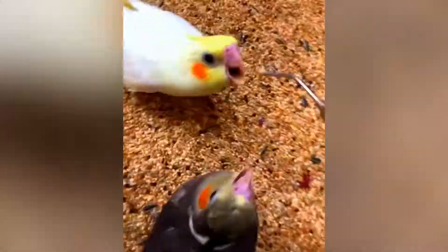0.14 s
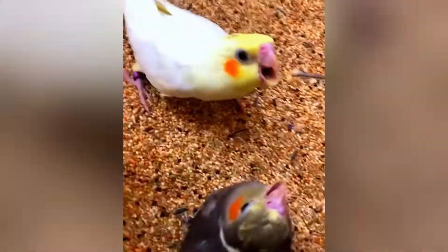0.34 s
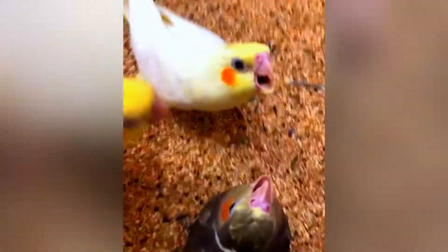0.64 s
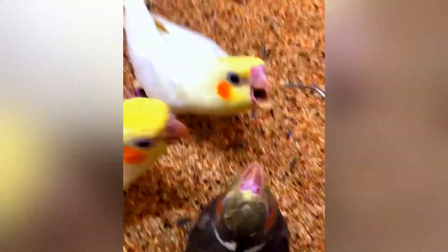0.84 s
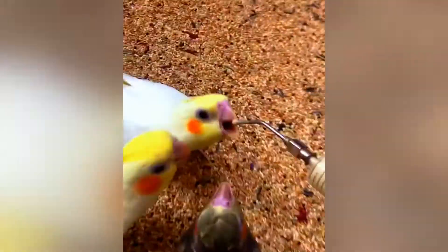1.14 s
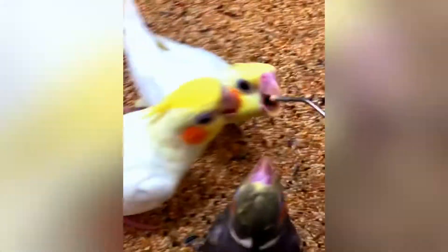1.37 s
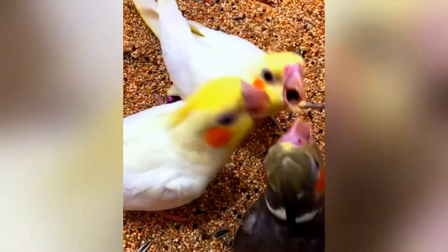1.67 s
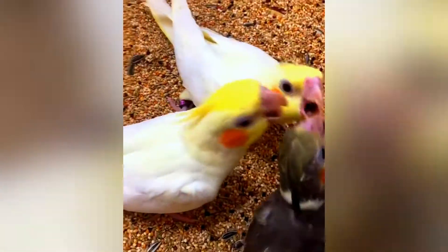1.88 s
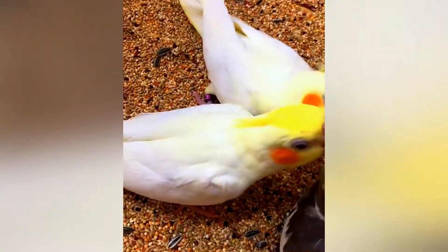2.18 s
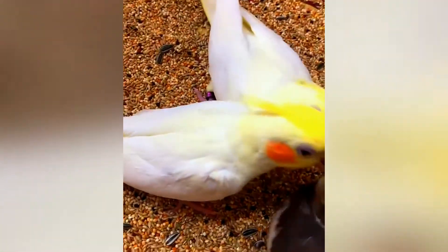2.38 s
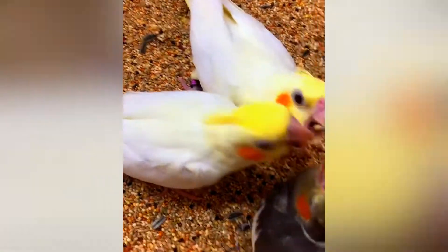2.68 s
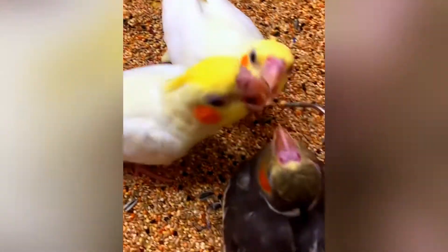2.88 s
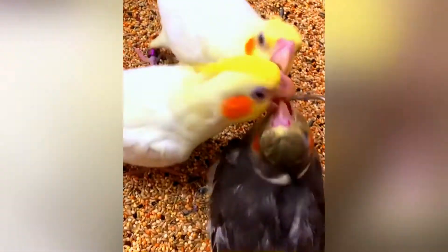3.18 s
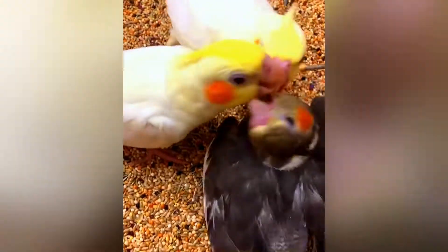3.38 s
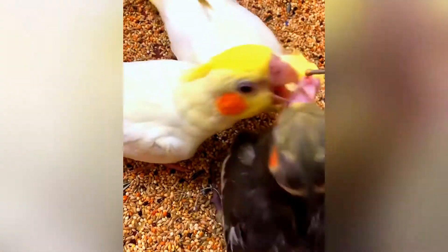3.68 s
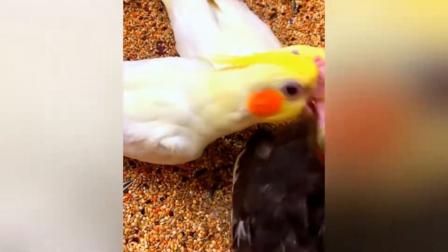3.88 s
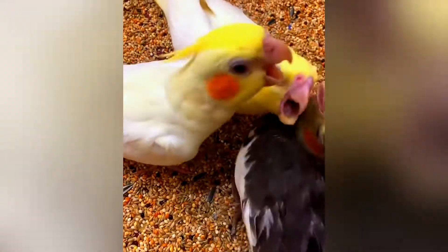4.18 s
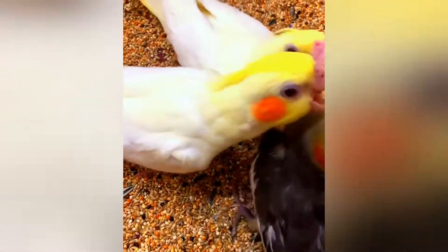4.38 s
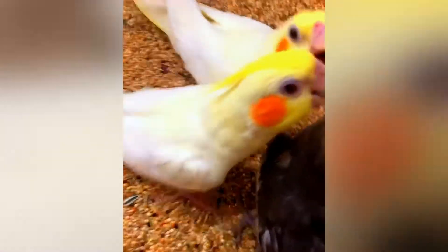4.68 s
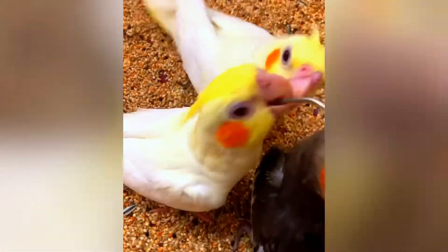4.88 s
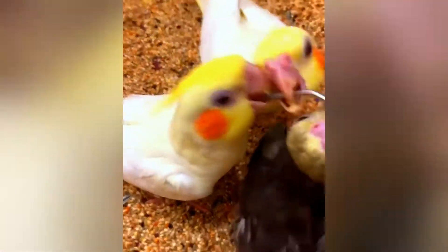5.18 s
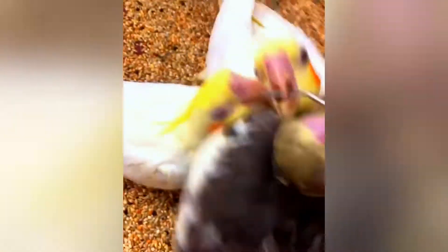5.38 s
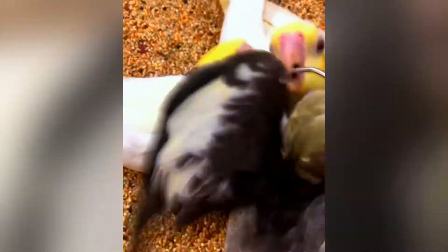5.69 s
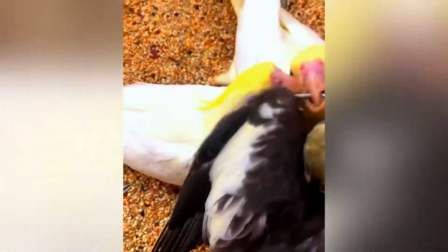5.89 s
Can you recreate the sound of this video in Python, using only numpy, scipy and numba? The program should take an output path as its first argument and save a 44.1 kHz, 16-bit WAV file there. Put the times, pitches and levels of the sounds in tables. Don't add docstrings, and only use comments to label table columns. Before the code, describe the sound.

Three young cockatiels beg right beside a hand-held phone in a quiet, dry room. Harsh fluttering rasps follow one another almost without a break, each swelling and cutting off abruptly, some on a tiny pip. Thin high whistles waver through the first four and a half seconds, a short arched peep comes near three seconds, and quick falling chirps close the scene. Dull knocks and taps come from the moving hand.

```python
import sys
import numpy as np
from scipy import signal
from scipy.fft import rfft, irfft
from scipy.io import wavfile
from scipy.ndimage import uniform_filter1d
from numba import njit

SR = 44100
rng = np.random.default_rng(int(sys.argv[2]) if len(sys.argv) > 2 else 0)


def to_wav(sig):
    pcm = np.clip(np.atleast_2d(sig), -1, 1) * 32767
    pcm = np.round(pcm).astype(np.int16)
    wavfile.write(sys.argv[1], SR, pcm.T)


def ratio_of_db(decibels):
    return 10 ** (np.asarray(decibels, float) / 20)


N = 266011
TIME = np.arange(N) / SR


def rms_one(x):
    return x / np.sqrt(np.mean(x ** 2) + 1e-20)


def in_time(rows):
    s, *columns = np.transpose(rows)
    return [np.interp(TIME, s, c) for c in columns]


def while_sounding(start_s, end_s, rise_s, fall_s):
    return np.clip((TIME - start_s) / rise_s, 0, 1) * np.clip((end_s - TIME) / fall_s, 0, 1)


def drift(rate_hz):
    r = np.exp(-2 * np.pi * rate_hz / SR)
    return rms_one(signal.lfilter([1], [1, -2 * r, r * r], rng.standard_normal(N + SR))[SR:])


def sine(hz):
    return np.sin(2 * np.pi * np.cumsum(hz) / SR)


def band_noise(low_hz, high_hz, order, length=N):
    sos = signal.butter(order, [low_hz, high_hz], "band", fs=SR, output="sos")
    return rms_one(signal.sosfilt(sos, rng.standard_normal(length)))


def between(x, low_hz, high_hz):
    hz = np.fft.rfftfreq(N, 1 / SR)
    return signal.hilbert(irfft(rfft(x) * ((hz > low_hz) & (hz < high_hz)), N))


@njit
def resonate(x, c, r):
    y = np.zeros(len(x))
    for i in range(2, len(x)):
        y[i] = (1 - r * r) / 2 * (x[i] - x[i - 2]) + 2 * r * c[i] * y[i - 1] - r * r * y[i - 2]
    return y


def cavity(x, hz, width_hz):
    c, r = np.cos(2 * np.pi * hz / SR) * np.ones(N), np.exp(-np.pi * width_hz / SR)
    return rms_one(resonate(resonate(x, c, r), c, r))


# (frequency [Hz], density [dB per Hz])
ROOM_AIR = [(40, -34), (300, -10.5), (1000, -1), (3000, 8.5), (8000, -1)]


def floor():
    hz, (at_hz, db) = np.linspace(1, SR / 2, N // 2 + 1), np.transpose(ROOM_AIR)
    colour = ratio_of_db(np.interp(np.log(hz), np.log(at_hz), db, right=-60))
    return ratio_of_db(-13.5) * rms_one(irfft(rfft(rng.standard_normal(N)) * colour, N))


def room(x):
    t, t60_s = TIME[:SR // 6], .08
    echoes = rms_one(rng.standard_normal(len(t))) * ratio_of_db(-60 * t / t60_s) * (t > .003)
    return signal.fftconvolve(x, echoes)[:N]


# (centre [s], half length [s], level [dB])
SWAYS = [(.3, 0.093, -57), (.425, 0.062, -39.5), (0.583, 0.061, -51), (.7, .05, -59), (1.15, .06, -66),
         (1.35, 0.097, -57), (1.93, .03, -58), (2.835, .05, -67), (3.4, .06, -65), (4.62, .06, -61),
         (4.89, .025, -49), (5.09, .04, -63), (5.34, .04, -57), (5.536, 0.026, -38), (5.733, .03, -68)]
# (time [s], frequency [Hz], level [dB])
TAPS = [(.192, 480, -28), (.424, 835, -19), (1.908, 564, -32), (4.578, 800, -26), (4.945, 510, -26),
        (5.52, 680, -23), (5.521, 1020, -21.5)]


def sways_and_taps():
    sway_hz, tap_t60_s = 62.2, 0.033
    push = np.sqrt(2) * sine(sway_hz * ratio_of_db(4.9 * drift(24.7)))
    out = push * sum(ratio_of_db(db) * np.exp(-((TIME - s) / half_s) ** 2) for s, half_s, db in SWAYS)
    for s, hz, db in TAPS:
        t = np.clip(TIME - s, 0, 1)
        out += ratio_of_db(db - 60 * t / tap_t60_s) * np.clip(t / 0.0018, 0, 1) * np.sin(2 * np.pi * hz * t)
    return out


STILL_HAND_DB = -69.5
# (time [s], peak level [dB])
BUMPS = [(0.19, -42), (0.39, -33), (0.423, -11.5), (1.209, -46.5), (1.349, -51), (1.638, -39), (1.709, -40),
         (1.904, -39), (2.799, -35), (3.197, -38.5), (4.576, -29.5), (4.628, -37), (4.808, -38),
         (4.942, -41), (5.07, -31.5), (5.399, -32), (5.5, -30.5), (5.527, -29), (5.54, -52), (.83, -43),
         (1.05, -39), (4.11, -43.5), (2.551, -48)]


def grip():
    lead_s, tail_s = 0.056, 0.11
    level = ratio_of_db(STILL_HAND_DB)
    for s, db in BUMPS:
        shift = np.exp(np.where(TIME < s, (TIME - s) / lead_s, (s - TIME) / tail_s))
        level = level + ratio_of_db(-31 + 0.95 * db) * shift
    return level


# (frequency [Hz], level [dB])
CASE_RINGS = [(175, 1.5), (300, 7.5), (475, 6)]


def handling():
    out = np.zeros(N)
    t = TIME[:SR // 8]
    for s, db in BUMPS:
        at = round(s * SR)
        thud_db = db - 11 + 0.2 * (-30.5 - db) - 60 * t / 0.089
        thud = ratio_of_db(thud_db) * np.clip(t / 0.0039, 0, 1) * band_noise(90, 466, 1, len(t))
        edge = ratio_of_db(db - 13 - 60 * t / 0.02) * band_noise(400, 1100, 2, len(t))
        out[at:at + len(t)] += thud + edge
    knocks = signal.lfilter([.3], [1, -.7], out)
    s, db = np.transpose(BUMPS)
    knocks[(s * SR).astype(int)] += ratio_of_db(db + 23.5 + 1.3 * (db - db.max()))
    r = ratio_of_db(-60 / (.045 * SR))
    for hz, db in CASE_RINGS:
        poles = [1, -2 * r * np.cos(2 * np.pi * hz / SR), r * r]
        out = out + ratio_of_db(db - 39.0) * signal.lfilter([1, 0, -1], poles, knocks)
    rumble, deep = band_noise(80, 300, 2), band_noise(35, 110, 2)
    shifting = grip()
    hand = shifting * rumble + ratio_of_db(-12) * (shifting - ratio_of_db(STILL_HAND_DB)) * deep
    return out + ratio_of_db(5.3 * drift(3.1)) * hand


def syrinx_flutter(rough_db):
    return rng.standard_normal(N) * ratio_of_db(rough_db * drift(640) + 0.88 * drift(14.0))


def partials(hz, levels):
    phase = 2 * np.pi * np.cumsum(hz) / SR
    out = 0
    for k, level in enumerate(levels, 1):
        fade = np.clip((9500 - hz * k) / 1500, .05, 1) * (hz * k < 15900)
        out = out + level * fade * np.sin(k * phase)
    return out


# (time [s], length [s], first pitch [Hz], last pitch [Hz], level [dB])
SNAPS = [(0.471, 0.005, 1990, 2085, -5), (0.6145, 0.0048, 1930, 2100, -6), (1.771, 0.0077, 1855, 2380, -6),
         (2.093, 0.011, 1640, 2160, -12.5), (3.006, 0.0083, 1910, 2140, -8),
         (5.378, 0.0037, 1900, 2400, -9.5), (5.599, 0.011, 3930, 3460, -7.5),
         (5.895, 0.0068, 3300, 2980, -19.5)]
# (time [s], length [s], first pitch [Hz], last pitch [Hz], level [dB])
SQUEAKS = [(2.128, 0.0097, 3280, 2930, -16), (2.262, 0.011, 3580, 3120, -18),
           (2.407, 0.0094, 4050, 3200, -14.5), (2.554, 0.0092, 3900, 3870, -15.5),
           (5.3, 0.011, 4900, 4630, -24), (5.317, 0.012, 4020, 2800, -13.5),
           (5.381, 0.0065, 2670, 2590, -12.5), (.618, 0.0048, 2620, 2600, -24),
           (.747, .006, 1970, 2140, -20), (1.98, 0.011, 2440, 2460, -20), (3.11, 0.01, 2374, 2410, -21),
           (3.974, 0.032, 2280, 2460, -21), (1.857, 0.014, 2500, 2440, -25), (1.9, 0.016, 2420, 2450, -19),
           (1.92, 0.0089, 2550, 2470, -20), (4.092, 0.011, 2450, 2440, -19),
           (3.175, 0.01, 2400, 2410, -24.5), (3.155, .011, 2400, 2380, -26), (3.23, 0.014, 2400, 2400, -24),
           (3.372, 0.0094, 2380, 2380, -39), (3.42, 0.01, 2360, 2380, -29), (4.4, 0.013, 2230, 2300, -24.5),
           (5.58, .008, 1300, 1350, -19)]
# (time [s], length [s], first pitch [Hz], last pitch [Hz], level [dB])
BLIPS = [(1.643, 0.017, 2790, 2850, -16.5), (2.117, 0.0136, 3600, 4400, -23),
         (2.536, 0.015, 6000, 6250, -21), (3.1, .008, 4700, 4600, -22), (3.443, 0.019, 5820, 5880, -11),
         (4.1, .008, 7700, 7100, -22), (3.8, 0.011, 3500, 3650, -22), (3.8, .014, 5300, 5250, -24),
         (2.86, 0.0092, 2800, 2750, -22), (3.495, .01, 2900, 2880, -28), (3.52, 0.017, 5700, 3500, -24),
         (1.7, 0.0099, 2400, 2440, -30), (2.016, 0.009, 2800, 2880, -20)]


def pips(rows, step_db):
    out = np.zeros(N)
    for s, length_s, hz0, hz1, db in rows:
        at, u = round(s * SR), np.linspace(0, 1, round(length_s * SR))
        hz = hz1 + (hz0 - hz1) * (1 - u) ** 1.27
        levels_db = step_db * np.arange(7)
        levels_db[0] = -11 if hz0 < 2100 else 0
        snap = np.clip(u / .15, 0, 1) * np.clip((1 - u) / .15, 0, 1) * ratio_of_db(-4 * u)
        out[at:at + len(u)] += ratio_of_db(db) * snap * partials(hz, ratio_of_db(levels_db))
    return out


# (time [s], pitch [Hz], first partial level [dB])
PEEP = [(2.85, 1396, -30), (2.88, 1308, -30.5), (2.91, 1497, -25.5), (2.945, 1680, -29), (2.972, 1900, -47),
        (3.01, 2080, -34), (3.027, 2150, -29), (3.068, 1620, -29.5), (3.096, 1530, -22)]


def peep():
    ring_hz, ring_width_hz, ring_db, opens_s = 3380, 170, -12, 2.89
    hz, db1 = in_time(PEEP)
    db2 = ring_db - 10 * np.log10(1 + ((2 * hz - ring_hz) / ring_width_hz) ** 2)
    db2 -= 40 * np.clip((opens_s + .02 - TIME) / .04, 0, 1)
    waver = 1 + .011 * drift(60) * (TIME < 3.03) + .006 * drift(110)
    tone = partials(hz * waver, [ratio_of_db(db1 + 3), ratio_of_db(db2 + 2), ratio_of_db(db2 - 20)])
    tone += ratio_of_db(db2 - 9 - 6 * (TIME > 3.03)) * cavity(syrinx_flutter(rough_db=2.5), 2 * hz, 350)
    grain = ratio_of_db((.8 + 1.2 * (TIME < 3.02)) * drift(260))
    return tone * grain * while_sounding(PEEP[0][0], PEEP[-1][0], .012, .005)


# (time [s], pitch [Hz], level [dB])
CHIRPS = [
    [(5.42, 3310, -28), (5.435, 5500, -25), (5.441, 5940, -11), (5.448, 5980, -5.5), (5.452, 5140, -7),
     (5.457, 3880, -8.5), (5.461, 3570, -13), (5.465, 3080, -31)],
    [(5.58, 6340, -26), (5.584, 7300, -8.5), (5.589, 5900, -10.5), (5.596, 5900, -10), (5.6, 5200, -12)],
    [(5.6, 5700, -18), (5.605, 5880, -14), (5.609, 4950, -18), (5.612, 3930, -16.5), (5.6175, 3370, -9)],
    [(5.714, 6100, -22), (5.72, 5700, -16), (5.724, 5750, -11.5), (5.728, 4980, -9.5), (5.731, 4700, -10.5)],
    [(5.857, 7360, -22), (5.861, 5910, -21), (5.868, 6030, -14), (5.875, 5670, -9), (5.879, 4720, -8),
     (5.883, 3880, -10.5), (5.887, 3380, -8)],
    [(5.879, 6300, -20), (5.885, 5550, -21), (5.893, 5500, -17)],
]


def chirps():
    out = np.zeros(N)
    breath = cavity(syrinx_flutter(rough_db=0.0), 6500, 2000)
    for rows in CHIRPS:
        hz, level_db = in_time(rows)
        hz = uniform_filter1d(hz, size=70) * (1 + 0.00633 * drift(325))
        rising = np.gradient(uniform_filter1d(hz, size=200)) > 0
        over_db = -3.5 - 0.013 * np.clip(hz - 3800, 0, 1500) - 12 * rising
        tone = partials(hz, [1, ratio_of_db(over_db), ratio_of_db(1.8 * over_db)]) + ratio_of_db(-21) * breath
        gate = while_sounding(rows[0][0], rows[-1][0], 0.0012, 0.002)
        out += ratio_of_db(level_db + 1.5 * drift(350)) * gate * tone
    return out


def whistle(rows, breathy):
    hz, db = in_time(rows)
    clear = np.sqrt(2) * sine(hz * (1 + 0.00389 * drift(49.0))) * ratio_of_db(2 * drift(45))
    hoarse = cavity(syrinx_flutter(rough_db=2.5), hz, 280)
    mix = np.sqrt(1 - breathy) * clear + np.sqrt(breathy) * hoarse
    return ratio_of_db(db) * while_sounding(rows[0][0], rows[-1][0], 0.0064, 0.0043) * mix


def swelling(start_s, end_s, hz0, hz1, db):
    peak = 0.71
    return [(start_s, hz0, db - 6.5),
            (start_s + peak * (end_s - start_s), hz0 + peak * (hz1 - hz0), db),
            (end_s, hz1, db - 7.5)]


# (time [s], pitch [Hz], level [dB])
LOW_WHISTLE = [(0.08, 1420, -29), (0.104, 1206, -35), (0.158, 1239, -29), (0.224, 1473, -27),
               (0.38, 1275, -30), (0.42, 1350, -43)]
# (time [s], pitch [Hz], level [dB])
CLEAR_WHISTLES = [
    [(2.3, 4650, -40), (2.33, 4720, -35), (2.36, 4810, -27), (2.375, 4800, -30)],
    [(2.475, 4586, -29), (2.54, 4570, -22), (2.6, 4455, -23), (2.622, 4406, -24), (2.644, 4370, -24),
     (2.684, 4280, -35)],
    [(3.88, 4660, -35), (3.95, 4606, -27), (4.05, 4680, -19), (4.14, 4570, -27)],
    [(4.3, 4390, -31), (4.36, 4440, -26), (4.39, 4550, -32), (4.46, 4440, -34)],
    [(3.03, 4800, -28), (3.12, 4660, -32), (3.188, 4630, -35)],
    [(3.29, 4800, -32), (3.33, 4770, -25.5), (3.39, 4720, -24.5), (3.43, 4650, -22.5), (3.47, 4700, -20),
     (3.505, 4770, -30)],
]
# (start [s], end [s], first pitch [Hz], last pitch [Hz], peak level [dB])
HOARSE_WHISTLES = [(2.37, 2.477, 4950, 4800, -27), (2.594, 2.69, 4290, 4200, -28),
                   (0.01, 0.15, 4660, 5020, -25), (1.17, 1.279, 4890, 4590, -21.5),
                   (1.808, 2.08, 4690, 4640, -22.5), (3.739, 4.149, 4590, 4610, -20.5),
                   (4.292, 4.485, 4450, 4510, -21.5)]


def all_whistles():
    clear_breath, hoarse_breath = 0.049, .68
    out = whistle(LOW_WHISTLE, clear_breath) + sum(whistle(w, clear_breath) for w in CLEAR_WHISTLES)
    return out + sum(whistle(swelling(*w), hoarse_breath) for w in HOARSE_WHISTLES)


# (start [s], end [s], first frequency [Hz], last frequency [Hz], last level [dB])
WINDPIPE = [(0, 0.44, 1580, 1660, -31), (0.38, 0.62, 1660, 1800, -25.5), (0.623, 0.754, 1570, 1580, -32.5),
            (0.79, 1.5, 1570, 1510, -30), (1.45, 2.1, 1520, 1590, -28.5), (1.8, 2.1, 2400, 2420, -33),
            (3.9, 4.15, 2350, 2420, -32), (3.1, 3.45, 2400, 2380, -37), (0, .09, 2560, 2480, -31),
            (.76, 1.02, 2400, 2300, -34), (2.19, 2.3, 1400, 1400, -38), (0.877, 1.45, 1690, 1730, -31),
            (1.4, 1.655, 1720, 1820, -27), (2.23, 2.72, 1570, 1680, -31), (2.7, 3.012, 1710, 1760, -25),
            (3.092, 3.5, 1468, 1710, -36), (3.196, 4.568, 1316, 1347, -37),
            (3.752, 4.262, 1540, 1632, -31.5), (4.43, 4.63, 1650, 1700, -32),
            (4.64, 5.385, 1670, 1777, -27.5), (4.935, 5.592, 1230, 1333, -38),
            (5.592, 6.043, 1760, 1754, -33), (0.215, .35, 2990, 2700, -28), (0.838, 0.953, 3070, 3050, -31),
            (1.47, 1.63, 3050, 3320, -28.5), (2.835, 2.885, 4050, 4300, -22), (2.87, 2.93, 3900, 3850, -27),
            (.15, .62, 3920, 4080, -27), (4.45, 5.31, 4120, 3750, -30), (3.52, 3.74, 4050, 3800, -31),
            (.44, .53, 1320, 1310, -32), (5.555, 5.585, 4100, 4400, -23)]


def windpipes():
    out = np.zeros(N)
    for start_s, end_s, hz0, hz1, last_db in WINDPIPE:
        hz, db = in_time([(start_s, hz0, last_db - 4.5), (end_s, hz1, last_db)])
        air, hz = syrinx_flutter(rough_db=-1.0), hz * (1 + 0.006 * drift(10.98))
        locked = sine(hz + 30 * drift(130))
        tone_gain, air_gain = (1, .3) if hz0 < 2000 else (.55, .5)
        pipe = tone_gain * locked + air_gain * cavity(air, hz, 150) + .6 * cavity(air, hz + 80, 400)
        out += ratio_of_db(db) * while_sounding(start_s, end_s, 0.0056, 0.0032) * rms_one(pipe)
    return out


# (start [s], end [s], first level [dB], last level [dB], brightness [dB])
RASPS = [(0, 0.478, -27.5, -23, 1.5), (0.474, 0.618, -31.5, -28.5, 9), (0.621, 0.757, -29, -32.5, 5),
         (0.761, 1.297, -28.5, -24, 0.5), (1.302, 1.656, -26, -22.5, 1), (1.642, 1.783, -21, -23.5, -1),
         (1.78, 2.132, -26, -29, -1), (1.804, 2.04, -27.5, -25.5, -7), (2.185, 2.23, -42.5, -38, -2),
         (2.233, 2.491, -30.5, -26.5, -2.5), (2.496, 2.686, -30, -31, 0), (2.606, 3.017, -35, -26.5, 3.5),
         (3.026, 3.504, -27, -28.5, -8), (3.498, 3.855, -28.5, -25, -16.5), (3.85, 4.135, -25, -22.5, -11),
         (4.139, 4.308, -24, -29, -11), (4.31, 4.558, -27, -23.5, -8.5), (4.549, 4.9, -26, -24, -2.5),
         (4.903, 5.325, -24.5, -22, 0), (5.325, 5.388, -27.5, -28, 1.5), (5.392, 5.595, -35.5, -32, -1),
         (5.563, 6.04, -34, -30, -1)]


def effort(follows):
    swell_bend, open_s, snap_s, hush_db = 1.36, 0.0045, 0.0036, -50
    power = np.full(N, ratio_of_db(hush_db) ** 2)
    for start_s, end_s, db0, db1, bright_db in RASPS:
        rest = np.clip((end_s - TIME) / (end_s - start_s), 0, 1) ** swell_bend
        gate = while_sounding(start_s - open_s - snap_s, end_s, open_s, snap_s)
        power += (ratio_of_db(db1 + (db0 - db1) * rest + follows * bright_db) * gate) ** 2
    return np.sqrt(power)


# (time [s], centre [Hz])
BEAK_HZ = [(0, 4200), (.6, 4260), (1.2, 4400), (1.32, 4150), (1.6, 4260), (1.9, 4930), (2.25, 3850),
           (2.4, 4460), (2.8, 4200), (3.1, 4800), (3.6, 3680), (3.9, 4780), (4.25, 4250), (4.6, 4140),
           (5.3, 3740), (6.03, 3840)]
# (time [s], level [dB])
LOWER_RING = [(0, 1), (.38, -6.5), (.44, -14), (.7, -21), (.9, -2), (2, -4), (3, -1.5), (4, -1.5),
              (5, -4.5), (6.03, 0.5)]
# (centre [Hz], width [Hz], level [dB])
HISS = [(7310, 3700, 6), (9630, 840, -2.5), (12250, 3800, 3.5), (14600, 3200, -2.5)]
# (start [s], end [s], level [dB])
THROATY = [(-.1, 0.36, -29.5), (0.597, 1.203, -33), (1.276, 2.12, -44), (2.203, 3.013, -38.5),
           (3.0, 3.455, -40), (3.868, 4.208, -38.5), (4.275, 4.533, -36.5), (4.61, 5.405, -33),
           (5.506, 6.1, -33.5)]


def chorus():
    puffs = ratio_of_db(2.8 * drift(800) + .6 * drift(25))

    def ring(hz, width_hz):
        return cavity(puffs * rng.standard_normal(N), hz, width_hz)

    level = effort(0)
    beak = rms_one(ring(in_time(BEAK_HZ)[0], 1270) + ratio_of_db(in_time(LOWER_RING)[0]) * ring(3620, 750))
    hiss = rms_one(sum(ratio_of_db(db) * ring(hz, width_hz) for hz, width_hz, db in HISS))
    throat, gape, skirt = ring(2200, 940), ring(5490, 1940), ring(1355, 380)
    pouch = ratio_of_db(-24) * level
    for start_s, end_s, db in THROATY:
        pouch += ratio_of_db(db) * while_sounding(start_s, end_s, 0.013, 0.014)
    out = ratio_of_db(0.5) * level * beak + pouch * throat + ratio_of_db(-18) * level * skirt
    out += ratio_of_db(-4) * effort(0.79) * gape + ratio_of_db(-6.5) * effort(1) * hiss
    out = out - .9 * signal.lfilter(*signal.iirpeak(2850, 2.8, SR), out)
    return out + ratio_of_db(-1.0) * effort(0.3) ** 0.62 * floor()


TREBLE_FROM_HZ = 8400


def copied_up(tones):
    upper_shift_hz, lower_shift_hz = 7580, 4130
    upper = ratio_of_db(-13.5) * between(tones, 3400, 5600) * np.exp(2j * np.pi * upper_shift_hz * TIME)
    lower = between(tones, TREBLE_FROM_HZ - lower_shift_hz, 6640)
    lower = ratio_of_db(-16.0) * drift(1100) * lower * np.exp(2j * np.pi * lower_shift_hz * TIME)
    return (upper + lower).real


def scene():
    whistles = all_whistles()
    notes = peep() + pips(SNAPS, step_db=-4) + pips(SQUEAKS, step_db=-6) + pips(BLIPS, step_db=-20) + chirps()
    birds = chorus() + windpipes() + whistles + notes
    treble = copied_up((notes + ratio_of_db(-9.0) * whistles) * effort(0.91) / effort(0))
    return (birds + ratio_of_db(-42) * room(birds) + treble + handling() + sways_and_taps())[None]


# (centre [s], share of bins lost [0-1])
THIN_MOMENTS = [(.44, .55), (.54, .72), (.636, .64), (.992, .5), (1.064, .48), (1.46, .5), (1.668, .42),
                (1.9, .4), (2.898, .5), (3.062, .5), (3.222, .44), (3.293, .5), (3.5, .45), (3.99, .38),
                (4.86, .68), (4.92, .42), (5.175, .46), (5.267, .48), (5.8, .48), (6.01, .4)]


def thin_out(x):
    size = 2000
    out, window = x.copy(), signal.windows.tukey(size, .55)
    carried = np.fft.rfftfreq(size, 1 / SR) < TREBLE_FROM_HZ
    for s, share in THIN_MOMENTS:
        at = min(round(s * SR) - size // 2, N - size)
        bins = rfft(x[at:at + size] * window)
        near = uniform_filter1d(np.abs(bins), size=41)
        smooth = uniform_filter1d(np.abs(bins), size=8 if share > .55 else 3)
        standing = smooth / near ** (1.3 * (.8 - share)) * np.where(carried, 1, 1.5)
        lost = irfft(bins * (standing < np.quantile(standing[carried], share)), size)
        out[at:at + size] -= np.hanning(size) ** (2.5 * (.75 - share)) * lost
    return out


HIGH_TONE_HZ = [13264.4, 13953.5, 14642.6, 15676.3]
HIGH_TONE_DB = [-9, -10, -11, -12]
# (start [s], end [s])
HIGH_TONE_ON = [
    [(.03, .25), (.5, 1.46), (2.27, 2.47), (2.75, 2.9), (4.36, 4.95)],
    [(.23, .62), (1.05, 2.28), (2.38, 2.42), (2.5, 2.56), (2.72, 3.4), (4.36, 6.1)],
    [(0, .55), (.9, 2.12), (2.25, 3.6), (3.8, 4.2), (4.36, 5.5), (5.62, 6.1)],
    [(0, .14), (.48, .62), (2.6, 2.75), (2.92, 3.05), (4.82, 5.2), (5.38, 5.46), (5.55, 5.86)],
]
TOP_BANDS_HZ = [12800, 13450, 14200, 15050, 15800]
TOP_NOISE_DB = [0, -1, -17, 0]


def high_tones(x):
    below = uniform_filter1d(np.abs(between(x, 11000, 12800)), size=600)
    out = between(x, 0, TOP_BANDS_HZ[0]).real
    for k, spells in enumerate(HIGH_TONE_ON):
        on = uniform_filter1d(sum((TIME > a) * (TIME < b) for a, b in spells) * 1., size=400)
        tone = ratio_of_db(HIGH_TONE_DB[k] + 3 * drift(12)) * below * np.sin(2 * np.pi * HIGH_TONE_HZ[k] * TIME)
        noise = between(x, TOP_BANDS_HZ[k], TOP_BANDS_HZ[k + 1]).real
        noise_gain = (1 - on) * ratio_of_db(TOP_NOISE_DB[k]) + on * ratio_of_db(-22 + 4 * drift(8))
        out += on * tone + noise_gain * noise
    return out


def roll_off(x):
    return signal.sosfilt(signal.butter(12, 15920, fs=SR, output="sos"), x)


def record(dry):
    limited = 2.17 * np.tanh(dry[0] / 2.076)
    mix = high_tones(thin_out(limited))[None]
    return roll_off(mix)


dry = scene()
out = record(dry)
to_wav(out)
```